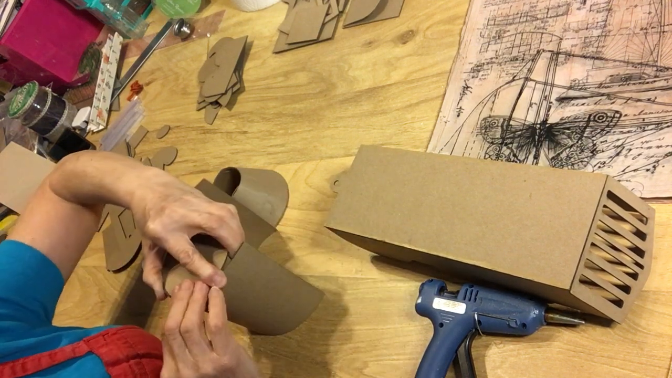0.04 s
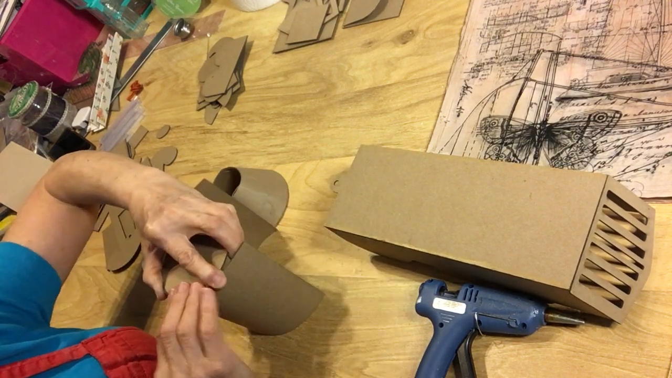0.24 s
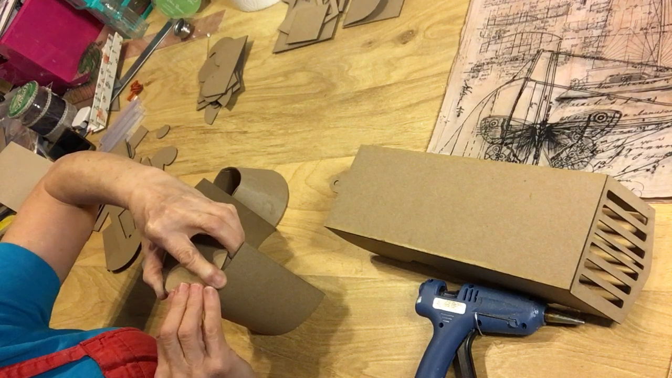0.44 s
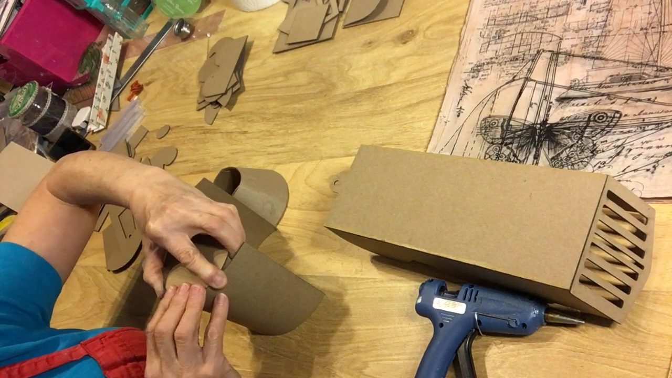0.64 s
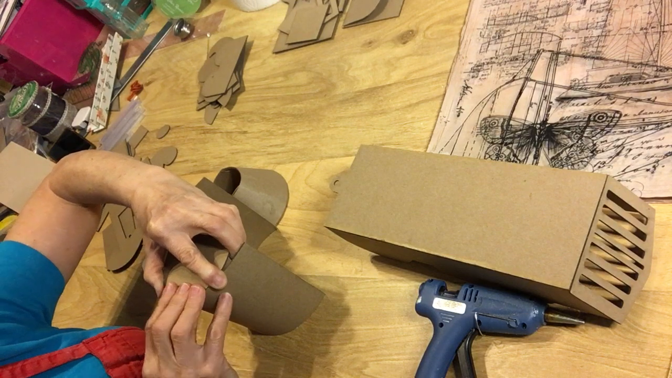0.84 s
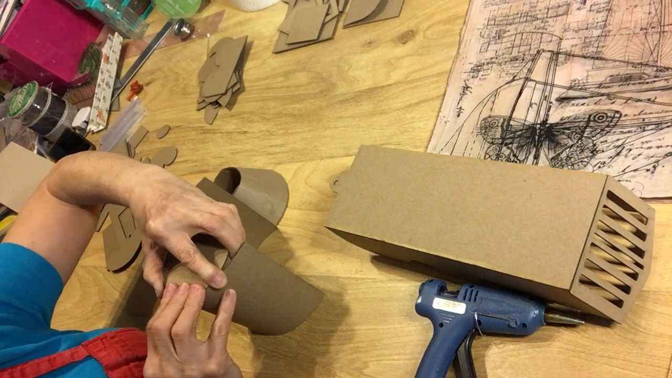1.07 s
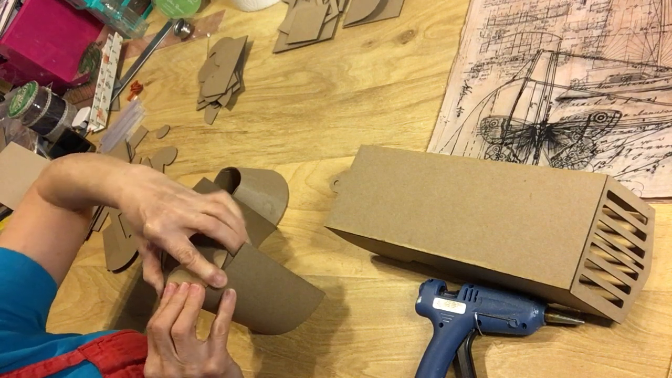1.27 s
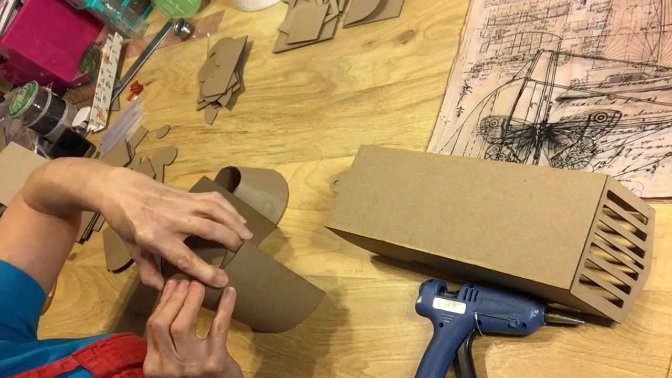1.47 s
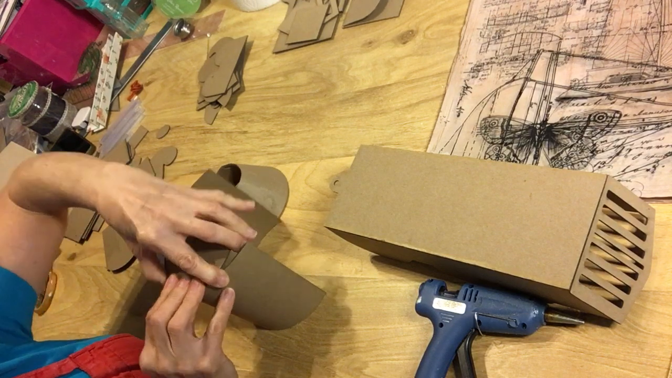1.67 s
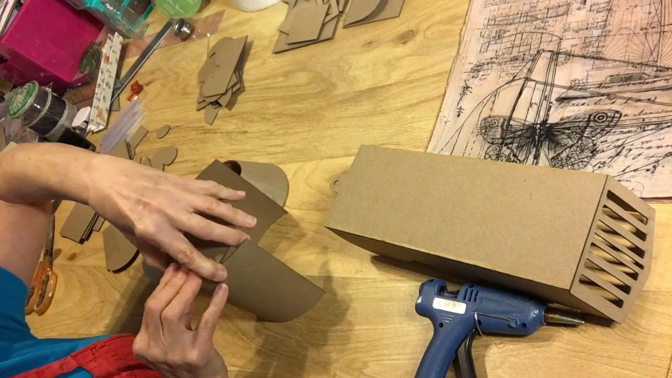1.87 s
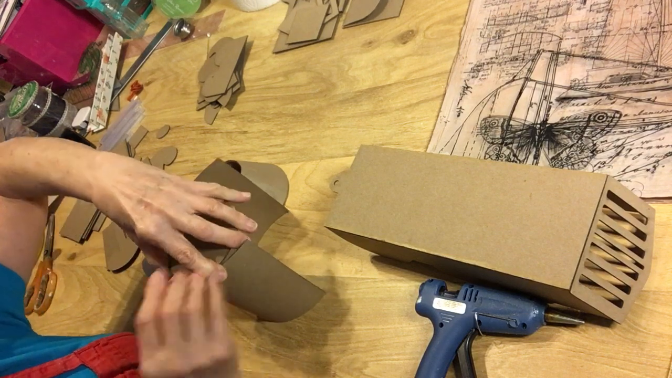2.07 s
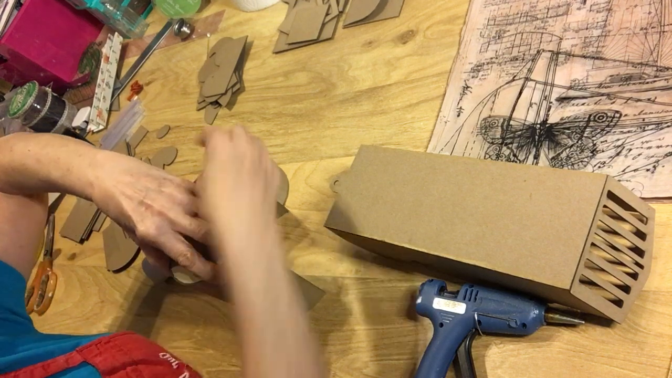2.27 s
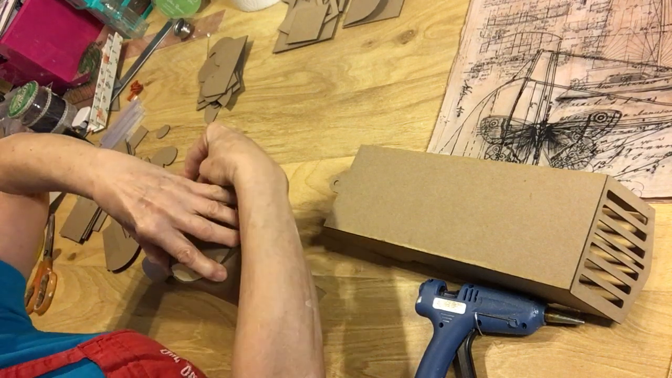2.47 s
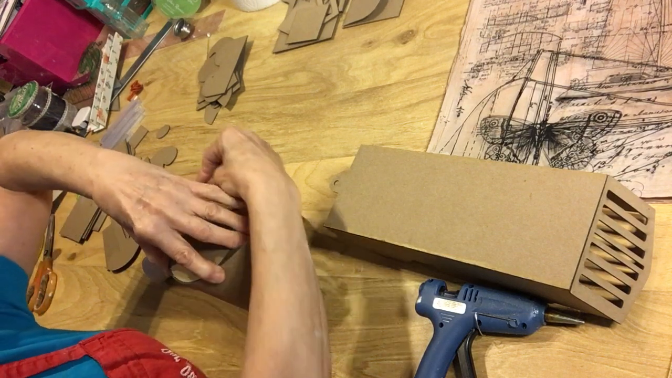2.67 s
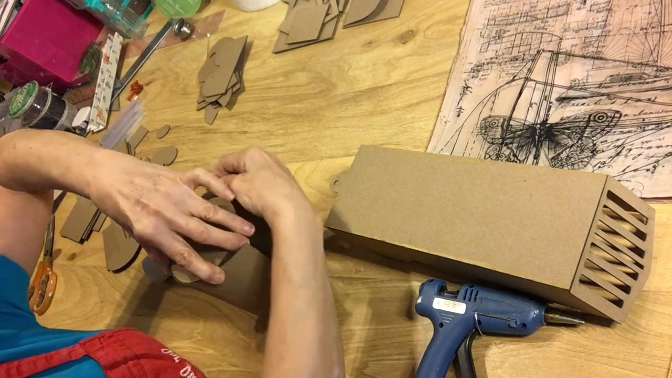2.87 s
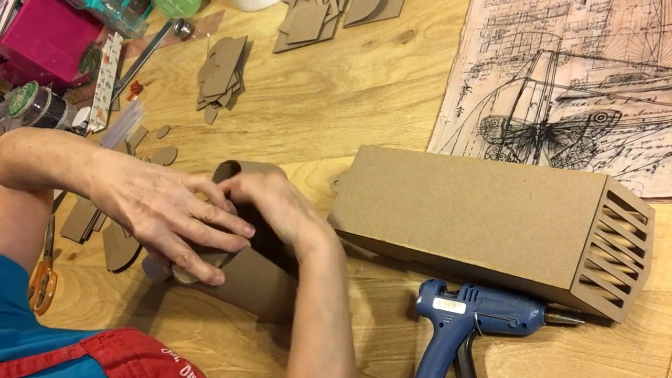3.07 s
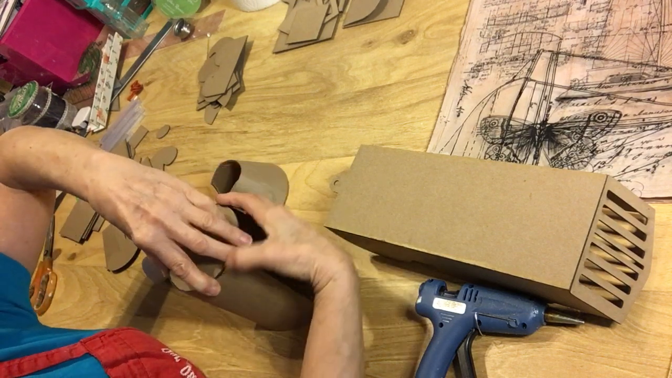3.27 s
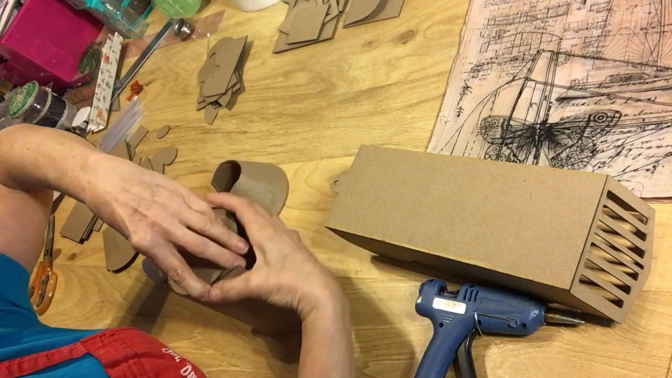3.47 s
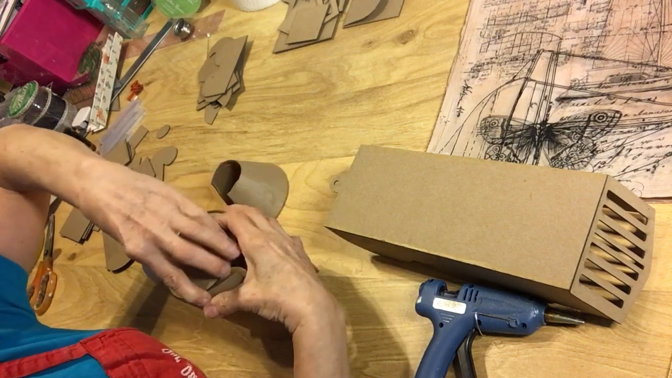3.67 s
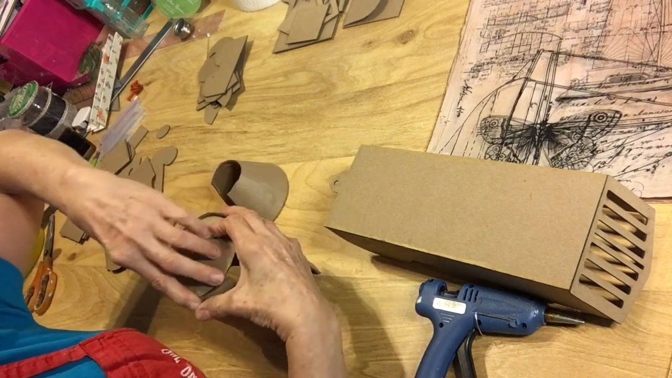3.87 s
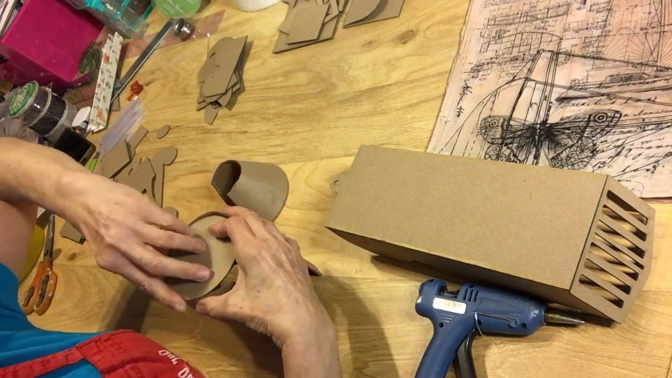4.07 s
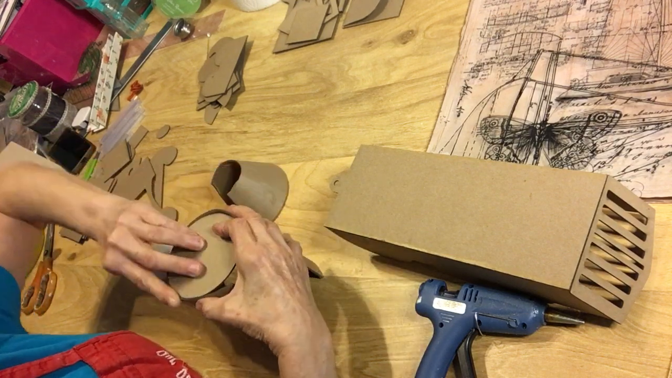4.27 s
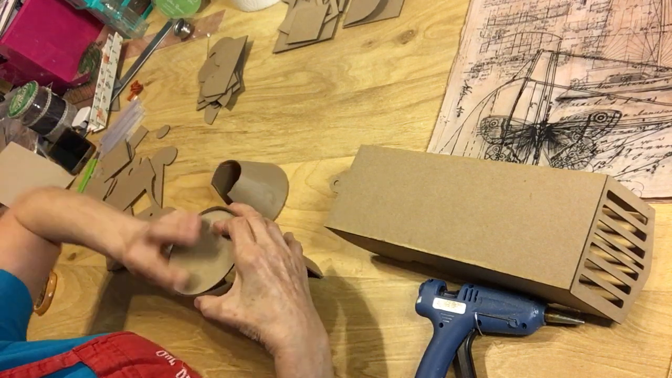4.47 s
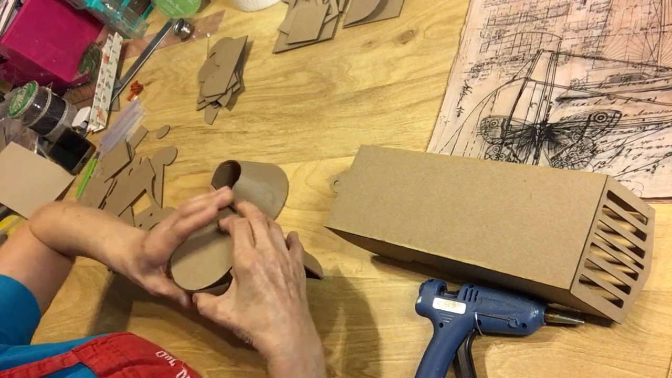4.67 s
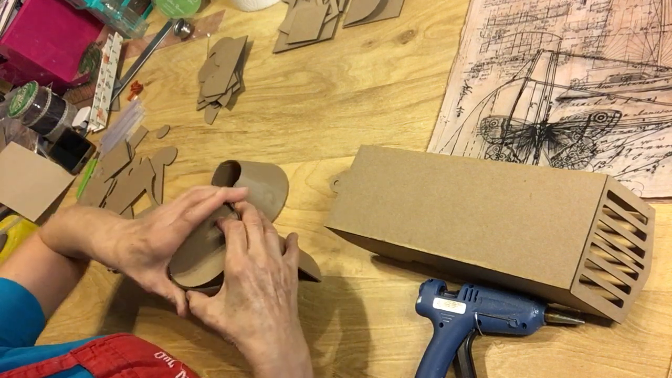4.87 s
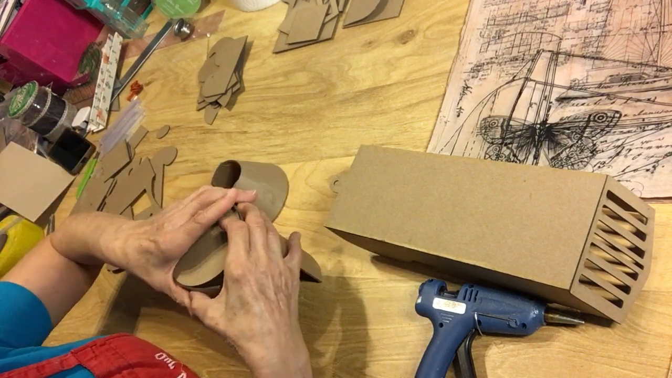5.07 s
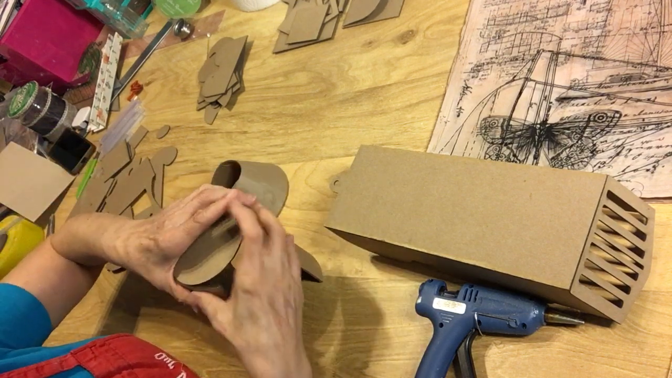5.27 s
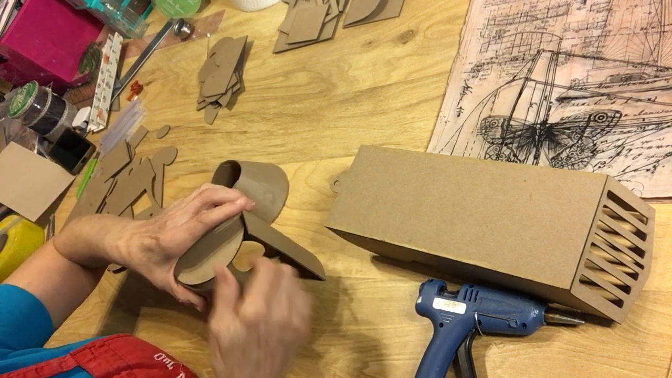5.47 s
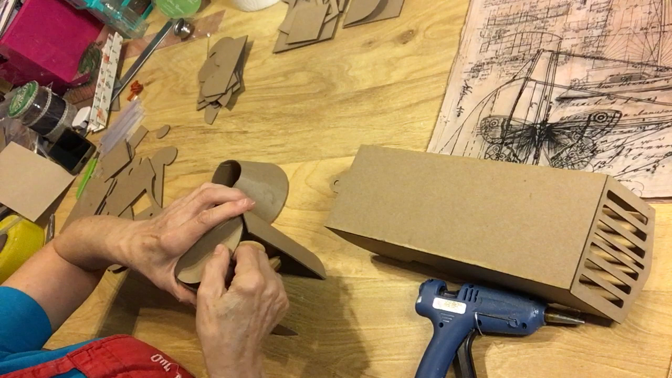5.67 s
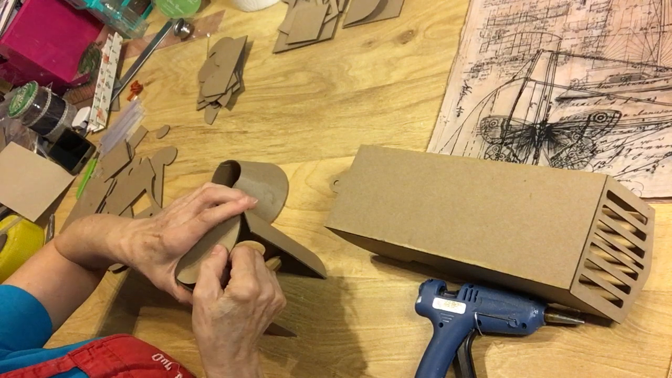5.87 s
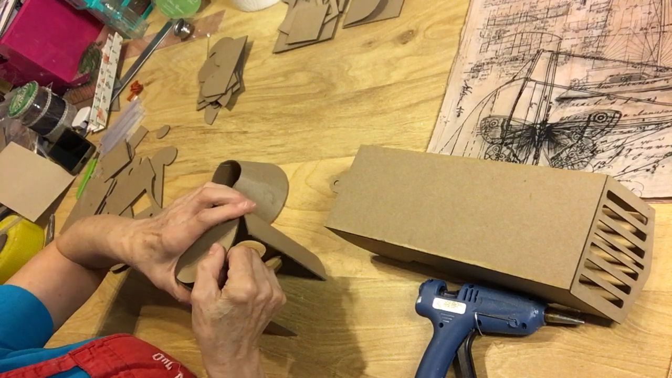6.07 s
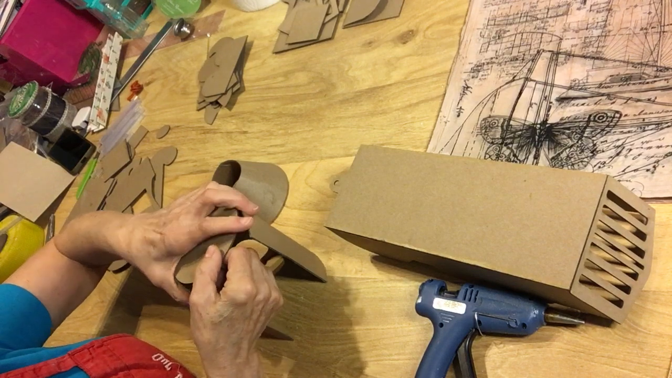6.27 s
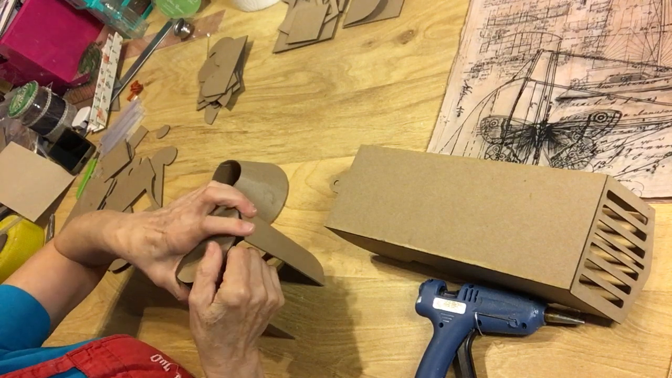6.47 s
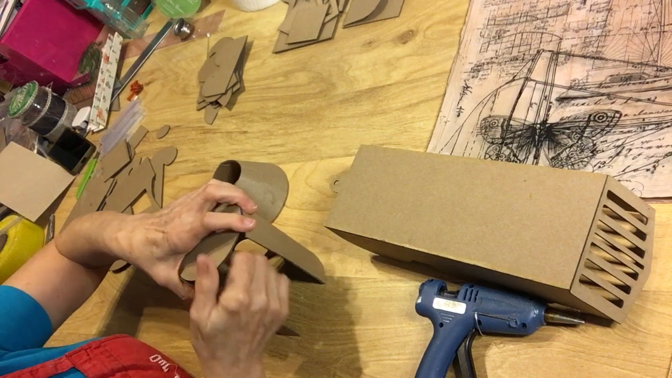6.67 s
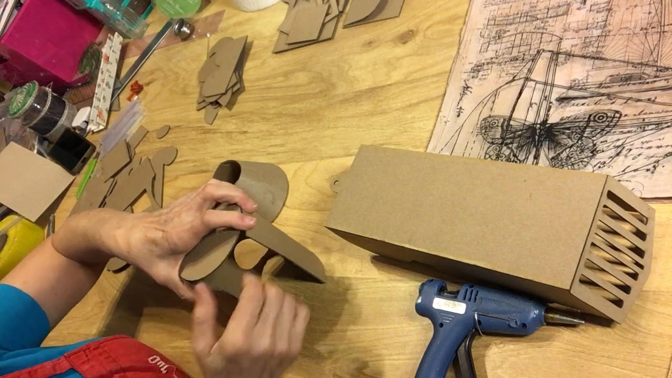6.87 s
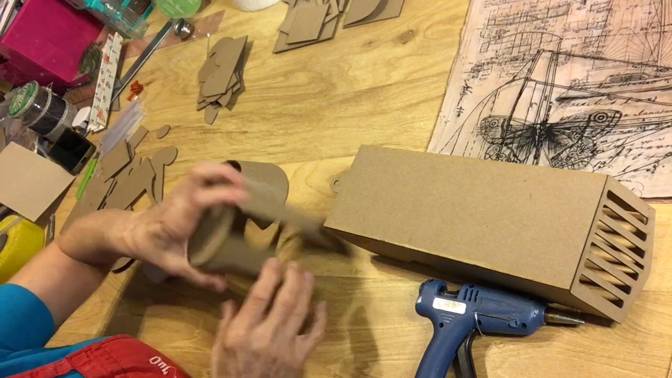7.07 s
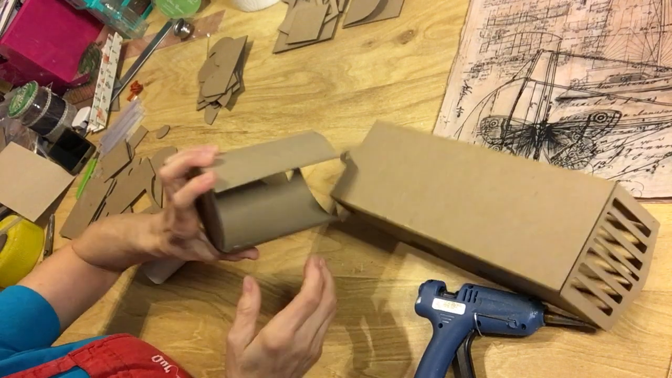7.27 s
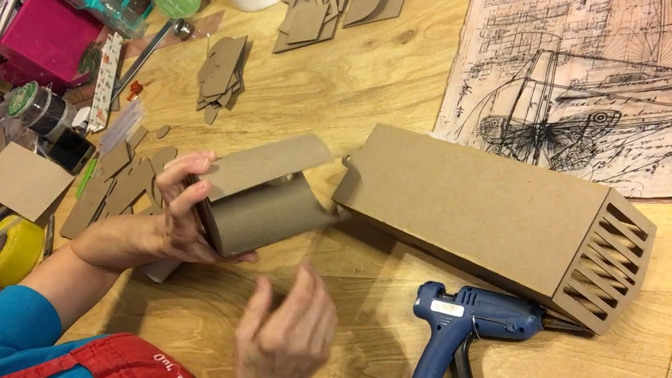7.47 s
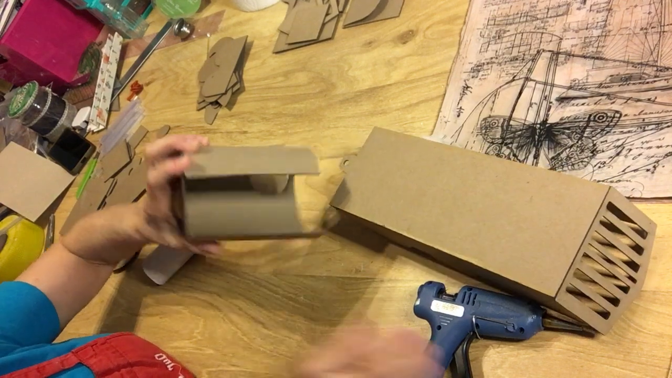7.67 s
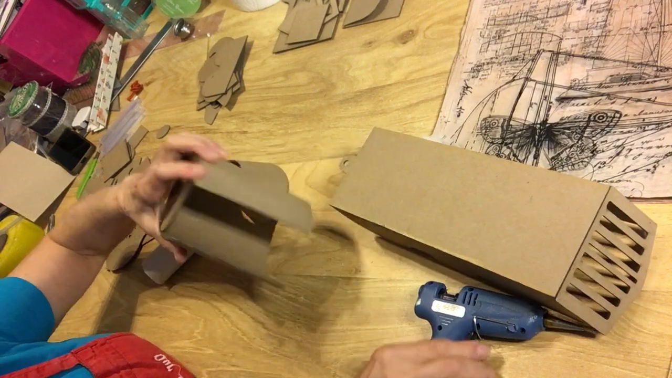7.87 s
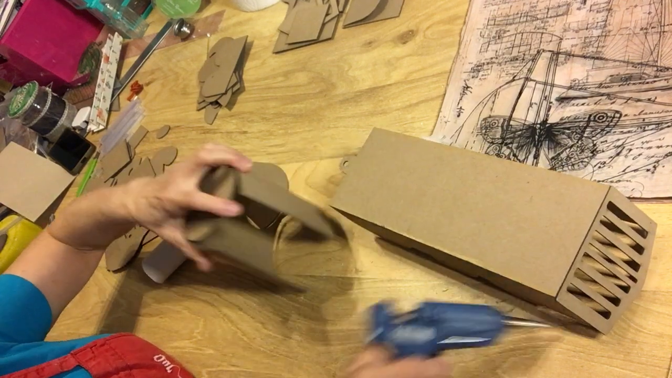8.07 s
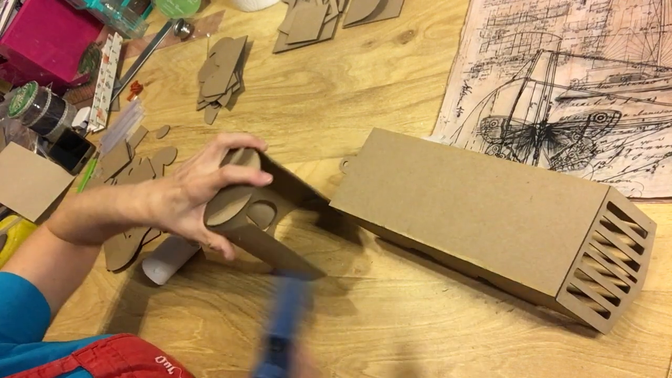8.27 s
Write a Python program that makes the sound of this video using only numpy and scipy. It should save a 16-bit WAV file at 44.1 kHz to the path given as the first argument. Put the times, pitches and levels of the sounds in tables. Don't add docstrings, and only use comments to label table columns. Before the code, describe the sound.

In a small quiet room, fingers press and slide over cardboard tubes close to the microphone. At first there are only faint rubs and tiny ticks, then scuffs and soft hollow bumps around the middle. Late on, a cluster of louder knocks comes as the tube is swung and set against the table, followed by a plastic glue gun snapping off the tabletop. A faint mains hum lies underneath.

```python
import sys
import numpy as np
from scipy import signal
from scipy.fft import rfft, irfft, next_fast_len
from scipy.io import wavfile

SR = 44100
rng = np.random.default_rng(int(sys.argv[2]) if len(sys.argv) > 2 else 0)


def persist_wave(psi):
    counts = np.round(np.clip(psi, -1, 1) * 32767).astype(np.int16)
    wavfile.write(sys.argv[1], SR, np.atleast_2d(counts).T)


def voltage_ratio(decibels):
    exponent = np.asarray(decibels, float) / 20
    return 10 ** exponent


N = 367088

GRIP_S = [0, 2.35, 3.0, 4.4, 4.75, 4.88, 5.5, 7.2, 7.9, 8.18, 8.4]
# (time [s], peak [dB], air pitch [Hz], wall re air [dB], ring t60 [s])
KNOCKS = [(0.394, -52.5, 646, -5, 0.1), (1.003, -54.5, 500, -5, 0.021), (1.353, -48, 826, -9, 0.035),
          (1.426, -58, 543, 6, 0.02), (3.534, -40.5, 460, -9, 0.049), (4.271, -36.5, 462, -0.5, 0.051),
          (5.287, -53.5, 920, 3.5, 0.045), (6.519, -56.5, 587, -4, 0.06), (1.606, -59, 900, -6, 0.035),
          (6.566, -51, 460, -14, 0.039), (7.102, -44, 374, -23, 0.033), (7.254, -32.5, 525, 0.5, 0.017),
          (7.325, -28.5, 613, -7, 0.04), (7.099, -47.5, 247, -10, .08), (7.258, -41, 264, -20, 0.089),
          (7.399, -25, 704, -1.5, 0.052), (7.41, -25, 850, 7.5, 0.02), (7.422, -23, 727, -16, 0.044),
          (7.473, -35, 800, 2, 0.021), (7.566, -47, 740, -9, 0.054), (8.1925, -21.5, 540, -21, 0.0073),
          (8.196, -30.5, 652, -11, 0.082)]


def rms_one(x):
    return x / np.sqrt(np.mean(x ** 2) + 1e-20)


def at_hz(points, hz):
    table_hz, values = np.array(points).T
    return np.interp(np.log(hz + 1), np.log(table_hz), values)


def coloured(x, spectrum):
    size = next_fast_len(N)
    gain = voltage_ratio(at_hz(spectrum, np.fft.rfftfreq(size, 1 / SR)))
    return irfft(rfft(x, size) * gain, size)[:N]


def band(x, low_hz, high_hz):
    return signal.sosfilt(signal.butter(2, [low_hz, high_hz], "band", fs=SR, output="sos"), x)


def between(x, low_hz, high_hz):
    size = next_fast_len(len(x))
    hz = np.fft.rfftfreq(size, 1 / SR)
    gain = 1 / (1 + (hz / high_hz) ** 6) - 1 / (1 + (hz / low_hz) ** 6)
    return irfft(rfft(x, size) * gain, size)[:len(x)]


def drift(rate_hz):
    r = np.exp(-80 * np.pi * rate_hz / SR)
    slow = signal.lfilter([1], [1, -2 * r, r * r], rng.standard_normal(N // 40 + 2002))[2000:]
    return np.interp(np.arange(N) / 40, np.arange(len(slow)), rms_one(slow))


def resonance(x, hz, width_hz):
    r = np.exp(-np.pi * width_hz / SR)
    zeros = np.array([1, 0, -1]) * (1 - r * r) / 2
    return signal.lfilter(zeros, [1, -2 * r * np.cos(2 * np.pi * hz / SR), r * r], x)


def add(out, s, sound):
    start = round(s * SR)
    out[start:start + len(sound)] += sound[:N - start]


def hum():
    phase = 2 * np.pi * 120.0 * np.arange(N) / SR + 0.1 * drift(1.5)
    level = np.sqrt(2) * voltage_ratio(-57 + 0.17 * drift(1.6))
    third = voltage_ratio(-25 + 3.2 * drift(4.2)) * np.sin(3 * phase)
    return level * (np.sin(phase) + third)


def room_air():
    # (frequency [Hz], density [dB])
    spectrum = [(13, -52), (22, -39), (64, -7), (92, -9.5), (121, -6.5), (147, -11.5), (174, -13.5),
                (355, -19), (481, -27), (651, -26), (1620, -32), (5900, -38), (7560, -41), (12400, -40),
                (15900, -51.5)]
    air = coloured(rng.standard_normal(N), spectrum)
    level_db = -68 + 2.1 * np.minimum(drift(5.2), .9)
    return air / np.std(band(air, 121, 15900)) * voltage_ratio(level_db)


def room(x, build_s):
    # (frequency [Hz], t60 [s])
    decay = [(150, 0.57), (700, 0.069), (2000, 0.38), (6000, 0.031), (15000, 0.11)]
    t = np.arange(int(.5 * SR)) / SR
    noise = rng.standard_normal(len(t))
    tail = np.zeros(len(t))
    for low_hz in 100 * 2. ** np.arange(8):
        tail += between(noise, low_hz, 2 * low_hz) * voltage_ratio(-60 * t / at_hz(decay, 1.4 * low_hz))
    tail *= 1 - np.exp(-(t / build_s) ** 2)
    return signal.fftconvolve(x, tail / np.sqrt(np.sum(tail ** 2)))[:N]


def thumps():
    top_hz, t60_s, rise_s, level_db = 195.5, 0.12, 0.012, -16.5
    pushes = np.zeros(N)
    pushes[[round(row[0] * SR) for row in KNOCKS]] = [voltage_ratio(row[1] + level_db) for row in KNOCKS]
    t = np.arange(int(.2 * SR)) / SR
    top = sum(np.sin(2 * np.pi * top_hz * multiple * t) for multiple in (.55, .8, 1.0, 1.35))
    return signal.fftconvolve(pushes, top * voltage_ratio(-60 * t / t60_s) * (1 - np.exp(-t / rise_s)))[:N]


def snaps(rows, ring_width):
    gain_db = -3.0
    out, t = np.zeros(N), np.arange(int(.08 * SR)) / SR
    for s, peak_db, hz, top_db, ring_db, t60_s in rows:
        burst = rng.standard_normal(len(t)) * voltage_ratio(-60 * t / max(t60_s, .003))
        ring = band(burst, 0.44 * hz, 1.15 * hz)
        ring += voltage_ratio(ring_db) * resonance(burst, hz, hz * ring_width)
        top = band(burst, 2500, 11000)
        sound = ring / abs(ring).max() + voltage_ratio(top_db + 12) * top / abs(top).max()
        add(out, s, voltage_ratio(peak_db + gain_db) * sound)
    return out


def tool_snap():
    # (time [s], peak [dB], pitch [Hz], top re peak [dB], ring re burst [dB], t60 [s])
    tool = [
        (8.191, -28.5, 2950, -40, 11, 0.011),
    ]
    return snaps(tool, ring_width=0.081)


def glue_pings():
    # (time [s], peak [dB])
    pings = [(1.5866, -65), (3.2337, -58), (3.315, -51), (5.8235, -51), (5.843, -55), (5.858, -61),
             (6.029, -58), (6.544, -54)]
    hz, top_db, ring_db, t60_s = 2880, -26, 40, 0.039
    return snaps([(s, db, hz, top_db, ring_db, t60_s) for s, db in pings], ring_width=.06)


def fibre_ticks():
    # (time [s], peak [dB], pitch [Hz], top re peak [dB], t60 [s])
    tick_rows = [(0.6663, -52.5, 1600, -23, 0.022), (1.351, -55.5, 4610, -13, 0.027),
                 (1.4254, -32.5, 3650, -15, 0.005), (1.6065, -47, 3680, -22, 0.018),
                 (2.2243, -63, 3050, -35, 0.01), (3.0576, -46, 2830, -32, 0.058),
                 (3.612, -50, 3020, -23, 0.022), (3.693, -52, 4390, -27, 0.05),
                 (4.1954, -46.5, 12500, -13, 0.01), (4.273, -45, 2300, -35, 0.027),
                 (4.4175, -49, 11500, -32, 0.0063), (5.29, -41.5, 5750, -28, 0.0096),
                 (5.635, -60, 2730, -21, 0.015), (5.881, -52, 2910, -12, 0.023),
                 (6.5187, -49.5, 2870, -22, 0.018), (6.568, -42.5, 3140, -17, 0.024),
                 (7.1013, -50, 5450, -12, 0.018), (7.2424, -46, 6000, -17, 0.0076),
                 (7.2543, -40.5, 4000, -25, 0.014), (7.2538, -33, 1400, -38, .03),
                 (7.3997, -30.5, 3030, -24, 0.045), (7.592, -55, 7500, -9, 0.0077),
                 (8.0226, -42.5, 6060, -21, 0.023), (8.0858, -32, 2300, -16, 0.007),
                 (8.0852, -34.5, 7000, -30, .008), (8.2769, -47, 5900, -16, 0.0062),
                 (8.277, -42, 12200, -30, .008), (7.455, -55, 13500, -28, .008),
                 (7.272, -39, 2300, -20, .015), (7.4094, -37, 3280, -30, 0.11),
                 (3.063, -41, 2080, -30, 0.068), (3.1, -48, 2830, -30, .04), (3.129, -52, 2850, -30, .04),
                 (5.291, -50, 6170, -30, 0.028), (5.7, -58, 1500, -25, .02), (5.76, -55, 1300, -25, .02),
                 (3.823, -59, 10500, -30, .04), (5.069, -57, 9000, -20, .03), (4.773, -57, 4400, -25, .02),
                 (2.5247, -59, 2200, -15, .02), (1.405, -53, 1200, -30, .015),
                 (7.995, -51, 1220, -30, 0.023), (.632, -54, 900, -20, .015)]
    ring_db = 4
    rows = [(s, db, hz, top_db, ring_db, t60_s) for s, db, hz, top_db, t60_s in tick_rows]
    return snaps(rows, ring_width=0.081)


def single_modes(table, rise_s):
    out, t = np.zeros(N), np.arange(int(.2 * SR)) / SR
    for s, peak_db, hz, t60_s in table:
        swell = (1 - np.exp(-t / rise_s)) * voltage_ratio(-60 * t / max(t60_s, .005))
        ring = np.sin(2 * np.pi * hz * t) * swell
        add(out, s, voltage_ratio(peak_db) * ring / abs(ring).max())
    return band(out, 150, 15000)


def hollows():
    # (time [s], peak [dB], pitch [Hz], ring t60 [s])
    pushes = [(2.537, -60, 590, 0.03), (2.612, -55, 650, .04), (2.644, -46, 618, 0.06),
              (2.662, -58, 700, .04), (2.682, -54, 590, .04), (2.705, -60, 656, .04), (2.73, -54, 640, .04),
              (2.746, -51, 675, 0.037), (2.768, -50.5, 600, .06), (2.869, -57, 640, .06),
              (2.885, -58, 616, .05), (3.0611, -35.5, 496, 0.05), (3.069, -35, 570, 0.04),
              (3.071, -42.5, 1090, 0.043), (3.099, -47, 1045, 0.043), (3.274, -50.5, 600, .06),
              (3.311, -49, 580, .06), (3.51, -53.5, 548, 0.1), (7.256, -36, 705, 0.026),
              (7.27, -37.5, 524, 0.045), (7.437, -35, 686, 0.037), (7.474, -39, 1137, .04),
              (8.192, -38, 2950, 0.014), (8.198, -52, 2900, .08), (5.64, -59, 970, 0.06),
              (5.66, -59, 650, .05), (.395, -62, 650, .05), (.396, -63, 1200, .06), (3.42, -54, 700, .04),
              (1.607, -56, 1090, .03), (6.52, -60, 900, .03), (7.474, -44, 770, 0.033),
              (4.272, -55, 1900, 0.035), (3.066, -55, 1890, .04)]
    return single_modes(pushes, rise_s=0.0016)


def taps():
    # (time [s], peak [dB], pitch [Hz], ring t60 [s])
    tap_rows = [(1.4256, -47, 6000, .005), (1.4256, -46, 12000, .005), (1.4262, -39, 1500, .006),
                (1.6065, -51, 1100, .02), (3.232, -55, 620, .03), (3.078, -44, 610, .02),
                (3.35, -61, 2950, .06), (3.4205, -50, 1000, .02), (3.433, -46, 420, .025),
                (3.434, -52, 1250, .02), (3.575, -58, 2900, .03), (3.8, -52, 560, .04),
                (5.835, -55, 620, .06), (5.73, -57, 680, .03), (5.45, -57, 620, .03),
                (6.52, -55, 1000, .02), (7.2555, -36, 900, .03), (7.27, -42, 1400, .02),
                (7.295, -43, 800, .03), (7.3255, -40, 950, .03), (7.376, -45, 800, .04),
                (7.4, -25, 1400, .025), (7.4005, -23, 680, .05), (7.4105, -26.5, 1500, .03),
                (7.442, -34, 1300, .02), (7.4745, -36, 1130, .07), (7.5, -44, 1150, .04),
                (8.193, -31, 400, .035), (8.1975, -31, 620, .02), (8.21, -41, 1050, .03),
                (8.087, -47, 1500, .02), (8.02, -57, 330, .05), (7.43, -44, 260, .12), (7.34, -46, 200, .1),
                (7.42, -44, 190, .12), (7.41, -39, 400, .08), (2.459, -60, 1200, .015),
                (3.085, -46, 1050, .04), (7.402, -40, 2700, .03), (7.425, -48, 2830, .12)]
    return single_modes(tap_rows, rise_s=.0003)


def struck_tube(table, contact_s, uneven, gain_db):
    # (multiple of pitch [1], level [dB])
    tube = [(.86, -5), (1.001, 2), (1.09, -7), (1.301, -9), (1.65, -17)]
    wall_hz = [1126, 1040, 1063, 1140, 1150, 1180, 940, 1172, 975, 970]
    out, t = np.zeros(N), np.arange(int(.2 * SR)) / SR
    multiple, mode_db = np.transpose(tube)[:, :, None]
    touch_t = t[:1000] / contact_s
    touch = touch_t * np.exp(-touch_t)
    for s, peak_db, air_hz, wall_db, t60_s in table:
        contact = touch * (1 + uneven * rng.standard_normal(1000))
        grip = np.searchsorted(GRIP_S, s) - 1
        for hz, db in ((air_hz, peak_db), (wall_hz[grip], peak_db + wall_db)):
            detune, vary = rng.standard_normal((2, len(tube), 1))
            fade = voltage_ratio(-60 * t * (multiple * hz / 600) ** 0.083 / max(t60_s, .008))
            waves = np.sin(2 * np.pi * hz * multiple * (1 + 0.037 * detune) * t)
            rings = np.sum(voltage_ratio(mode_db + 2.0 * vary) * waves * fade, axis=0)
            rings = band(signal.fftconvolve(rings, contact)[:len(t)], 0.66 * hz, 4.9 * hz)
            add(out, s, voltage_ratio(db + gain_db) * rings / abs(rings).max())
    return out


def soft_bumps():
    # (time [s], peak [dB], air pitch [Hz], wall re air [dB], ring t60 [s])
    bumps = [(2.184, -52.5, 650, -2, 0.041), (3.0595, -44, 560, 0, 0.072), (3.349, -52, 307, -1, 0.044),
             (3.419, -48.5, 407, -6, 0.12), (3.511, -50, 537, -7, 0.05), (3.594, -54, 441, -0.5, 0.19),
             (3.763, -59, 568, -11, 0.17), (4.575, -51, 325, -14, 0.039), (4.605, -48, 396, -18, 0.03),
             (4.69, -53, 382, -15, 0.037), (6.341, -50, 433, -13, 0.028), (7.241, -48, 850, -5, 0.089),
             (7.269, -38, 536, -6, 0.02), (7.316, -42, 690, -3, 0.026), (7.435, -29, 794, -15, 0.034),
             (7.489, -52, 322, -14, 0.052), (8.222, -39, 698, -10, 0.04), (8.209, -36, 800, -2.5, 0.048)]
    return struck_tube(bumps, contact_s=0.0017, uneven=22, gain_db=0.5)


def hard_knocks():
    return struck_tube(KNOCKS, contact_s=0.000088, uneven=1.0, gain_db=0.76)


def strokes():
    # (start [s], hold [s], tube air
    # [dB], fibre hiss re air [dB])
    slides = [(0.0, 1.38, -81, -6), (1.496, 0.21, -65, -18.5), (1.725, 0.14, -64, -4),
              (2.101, 0.028, -71, 1.5), (2.171, 0.035, -63.5, -15), (2.594, 0.33, -65, -4),
              (3.097, 0.057, -56.5, -10.5), (3.248, 0.15, -58, -9), (3.429, 0.017, -52.5, -21.5),
              (3.505, 0.066, -61, -7), (3.603, 0.02, -60, -3.5), (3.64, 0.13, -62.5, -11.5),
              (3.81, 0.57, -66.5, -7), (4.4, 0.3, -73.5, 3.5), (4.622, 0.068, -63, 5),
              (4.757, 0.12, -63.5, -2.7), (2.523, .045, -64, -8), (2.633, 0.13, -64.5, -4),
              (3.54, 0.022, -76, 10), (7.35, .04, -77, 17), (4.926, 0.095, -67, 5),
              (5.037, 0.12, -68.5, -4), (5.29, 0.13, -70, 1), (5.69, 0.21, -67, -8.5),
              (6.297, 0.1, -72, 2.5), (6.473, 0.072, -61, -15), (6.613, 0.068, -62, -6),
              (6.905, 0.18, -74, -27), (7.03, 0.078, -64.5, -3.5), (7.327, 0.16, -64, -12),
              (7.474, 0.025, -56, -11), (7.592, 0.034, -57, -15), (7.886, 0.17, -75.5, -11),
              (8.238, 0.079, -62.5, -11),
              (2.3, .19, -75, -12), (2.96, .07, -78, 3), (7.67, .06, -70, -20), (1.95, .1, -79, -6),
               (0.198, 0.027, -87, 14.5), (.7, 0.031, -87, 13), (1.052, 0.1, -83, 2),
               (2.215, 0.023, -82.5, 13.5), (2.795, .07, -70, -1), (4.838, .02, -65.5, 2),
               (5.431, 0.02, -63, -21), (6.048, .05, -65, -7), (6.934, 0.023, -66, -21),
               (1.818, 0.084, -61, -10), (7.996, 0.054, -62.5, -13), (3.823, .03, -91, 17),
               (7.61, 0.054, -58.5, -26), (4.638, .02, -77, 0), (5.036, 0.022, -59, -16),
               (8.01, 0.018, -64.5, -29)]
    # (time [s], tube air [dB], fibre hiss re air [dB], fade [dB/s])
    scuffs = [(.395, -71, -40, 70), (0.663, -77.5, 9, 110), (1.35, -63.5, -13, 85), (1.423, -66.5, 3, 109),
              (3.062, -56, -5, 96), (3.763, -46.5, -27, 167), (4.27, -50, -16, 103), (5.29, -62, 3, 104),
              (5.638, -62, -8, 106), (5.818, -60, -15, 93), (7.102, -50.5, -6, 171), (7.243, -60.5, 4, 61),
              (7.254, -47, -16, 87), (7.4, -31, -25, 170), (7.592, -79, 9, 200), (8.022, -79, 16.5, 192),
              (8.086, -78, 23.5, 139), (8.192, -39, -22, 175)]
    layer_share = [0, .45, .8, 1]
    layer_fade = [1.4, 1.44, 1.6, 1.45]
    # (wall [dB], edge [dB])
    grip_frees = [(2, 2.8), (-0.5, -2), (-0.5, -1), (-2, -2.5), (-5.5, 1), (-4, -1.8), (-1, 1.5), (7.5, 1),
                  (2, 0), (7.5, 3.5)]
    press_db_per_s, ease_db_per_s, slip_db_per_s = 207, 262, 7000
    crown_max_db = 4
    t = np.arange(0, N + 64, 32) / SR
    share, fade = np.array(layer_share)[:, None], np.array(layer_fade)[:, None]
    power = 0
    for s, hold_s, air_db, hiss_db in slides:
        crown_db = crown_max_db * np.minimum(1, (2 * (t - s) / hold_s - 1) ** 2)
        ramp_db = np.maximum(press_db_per_s * (s - t), ease_db_per_s * (t - s - hold_s))
        loss_db = crown_db + np.maximum(0, ramp_db)
        power = power + voltage_ratio(air_db + share * hiss_db - loss_db) ** 2
    for s, air_db, hiss_db, fade_db_per_s in scuffs:
        loss_db = np.maximum(slip_db_per_s * (s - t), fade * fade_db_per_s * (t - s))
        power = power + voltage_ratio(air_db + share * hiss_db - loss_db) ** 2
    gains = np.sqrt(power)
    grip = np.searchsorted(GRIP_S, t, side="right") - 1
    gains[1:3] *= voltage_ratio(np.transpose(grip_frees)[:, grip])
    return np.array([np.interp(np.arange(N) / SR, t, gain) for gain in gains])


def rubbing(slips_per_s, slip_spread_db, smooth_db, body_db, lumpy_db):
    edges_hz = [200, 850, 2200, 5500, 17000]
    # (frequency [Hz], width [Hz], level [dB])
    grips = [
        [(1028, 200, -13), (2046, 89, -18), (3150, 150, -8), (3410, 13, -17), (4100, 230, -18),
         (5740, 220, -27)],
        [(600, 160, -4), (1120, 13, -23), (1850, 29, -14), (2380, 350, -12), (4230, 210, -22), (5400, 120, -21),
         (11800, 650, -19)],
        [(1167, 57, -24), (2910, 12, -3), (558, 140, -27), (1650, 14, -22), (4400, 96, -25), (5420, 130, -28),
         (6260, 90, -26), (8790, 220, -31), (11900, 500, -20)],
        [(374, 250, -24), (1400, 66, -17), (4390, 60, -16), (5610, 340, -17), (7000, 91, -18), (8860, 300, -30),
         (11920, 900, -28)],
        [(2920, 43, -33), (4400, 160, -18), (6200, 82, -4), (7170, 90, -24), (12200, 520, -34)],
        [(3040, 100, -22), (4400, 150, -14), (5000, 76, -9), (6390, 280, -22), (12200, 510, -29)],
        [(650, 220, -21), (2840, 140, -20.5), (5840, 380, -26), (8750, 670, -20), (11900, 690, -8)],
        [(747, 100, 8), (1100, 100, 1), (1400, 100, -14), (2005, 67, -22), (2460, 140, -28), (5500, 230, -31),
         (12100, 700, -19)],
        [(1200, 67, -10), (2300, 360, -22), (3700, 100, -16), (5300, 200, -12), (6370, 80, -8),
         (10800, 300, -26)],
        [(447, 60, -30), (646, 69, -8), (900, 35, -26), (1110, 45, -15), (1470, 150, -24), (2900, 200, -26),
         (12200, 500, -14)],
    ]
    # (frequency [Hz], density [dB])
    fibre = [(150, -53), (250, -20.5), (366, -2.5), (527, -12), (616, -6.5), (759, -11.5), (1070, -9.5),
             (1520, -12), (4380, -9.5), (12000, -11), (15800, -12)]
    sizes = voltage_ratio(slip_spread_db * np.minimum(rng.exponential(1, N), 5)) * rng.choice([-1, 1], N)
    slips = rms_one(sizes * (rng.random(N) < slips_per_s * voltage_ratio(1.5 * drift(15)) / SR))
    drag = coloured(slips + voltage_ratio(smooth_db) * rng.standard_normal(N), fibre)
    gains = strokes() * voltage_ratio([db * np.minimum(drift(32), 1.3) - 3.0 for db in lumpy_db])
    out, shifting = np.zeros(N), np.tile(drift(7.8), 2)
    for start_s, end_s, modes in zip(GRIP_S, GRIP_S[1:], grips):
        span = slice(int(start_s * SR), min(int(end_s * SR), N))
        ringing = 0
        for hz, width_hz, db in modes:
            shift = shifting[int(hz * 37) % N:][span]
            ringing = ringing + resonance(drag[span], hz, 1.8 * width_hz + 20) * voltage_ratio(.5 * db + 4 * shift)
        body = drag[span] + voltage_ratio(body_db) * ringing
        for low_hz, high_hz, gain in zip(edges_hz, edges_hz[1:], gains):
            out[span] += rms_one(between(body, low_hz, high_hz)) * gain[span]
    return out


def scene():
    rub = rubbing(slips_per_s=1800, slip_spread_db=2.0, smooth_db=1.5, body_db=11.5,
                  lumpy_db=[3.2, 2.74, 1.74, 1.2])
    knock = hard_knocks() + soft_bumps() + hollows() + taps()
    tick = fibre_ticks() + glue_pings() + tool_snap()
    wet = room(voltage_ratio(-10.5) * knock + voltage_ratio(-14) * tick + voltage_ratio(-14.0) * rub, build_s=0.0037)
    return (rub + knock + thumps() + tick + wet + room_air() + hum())[None]


def band_limit(x):
    return signal.sosfilt(signal.butter(12, 16480, fs=SR, output="sos"), x)


def record(dry):
    low_pass = signal.cheby2(14, 50, 16110, fs=SR, output="sos")
    return band_limit(signal.sosfilt(low_pass, dry))


dry = scene()
out = record(dry)
persist_wave(out)
```